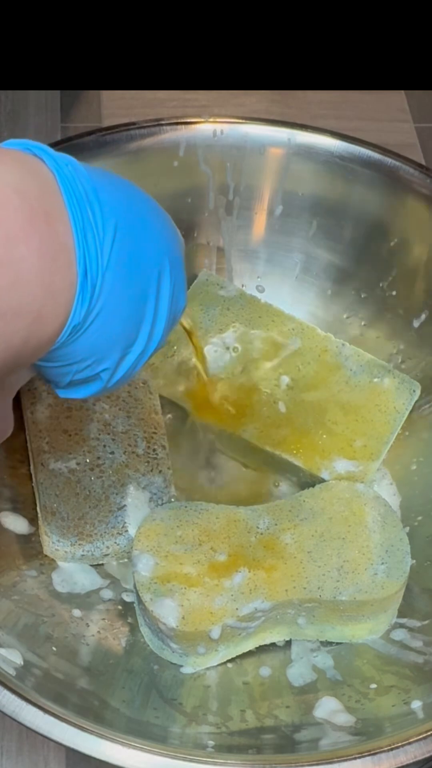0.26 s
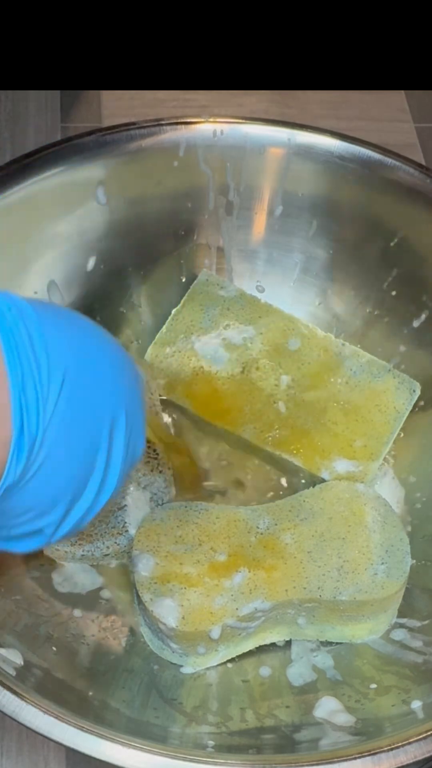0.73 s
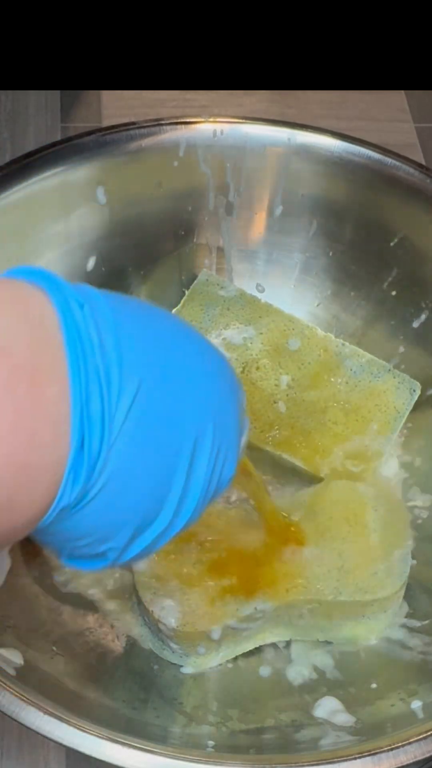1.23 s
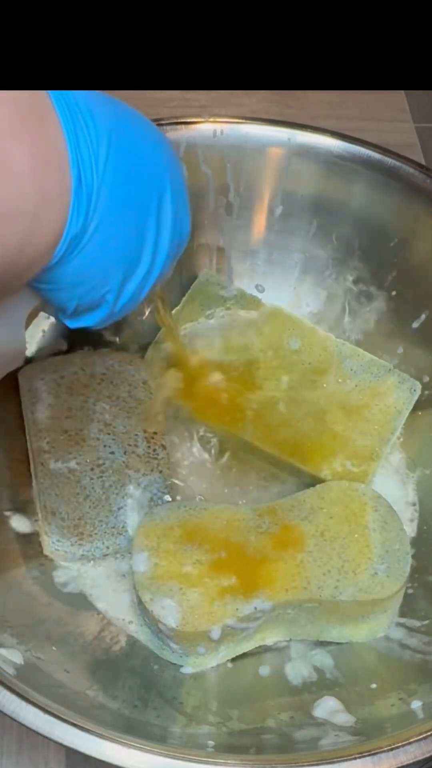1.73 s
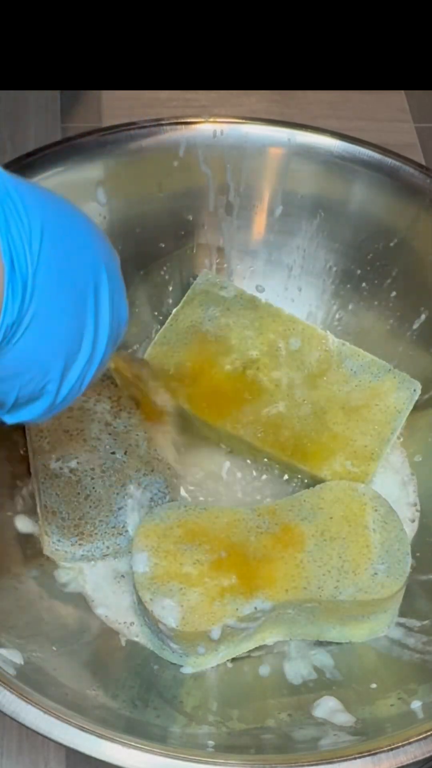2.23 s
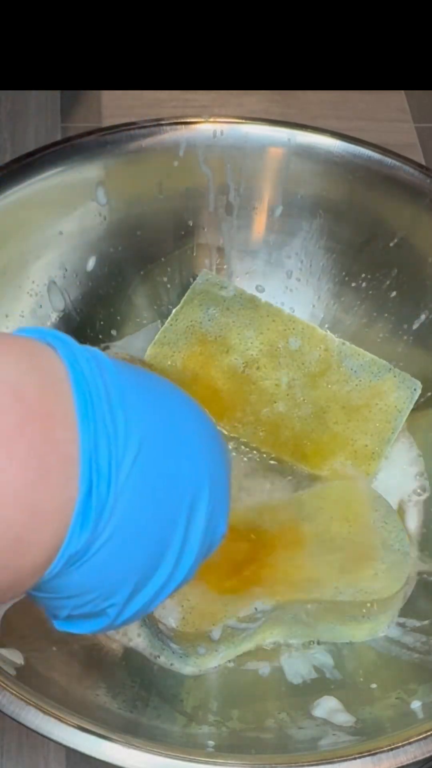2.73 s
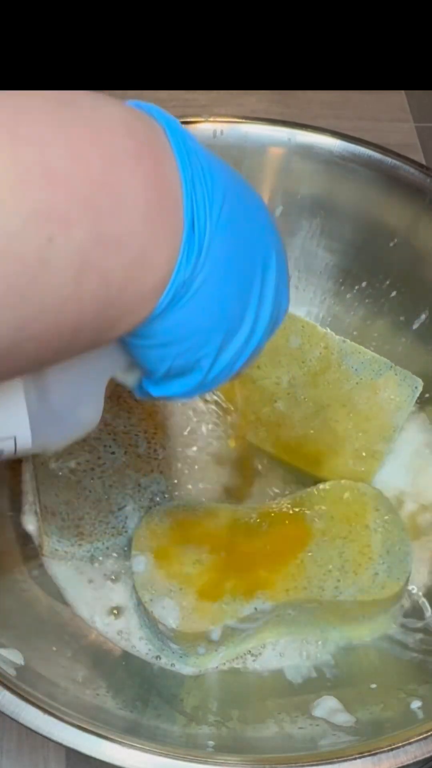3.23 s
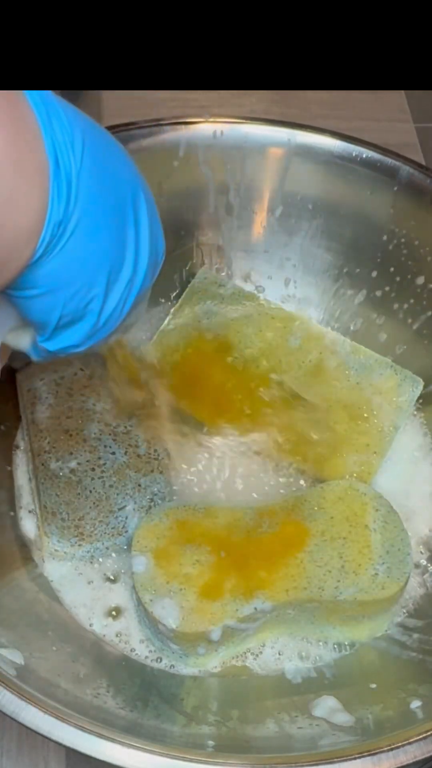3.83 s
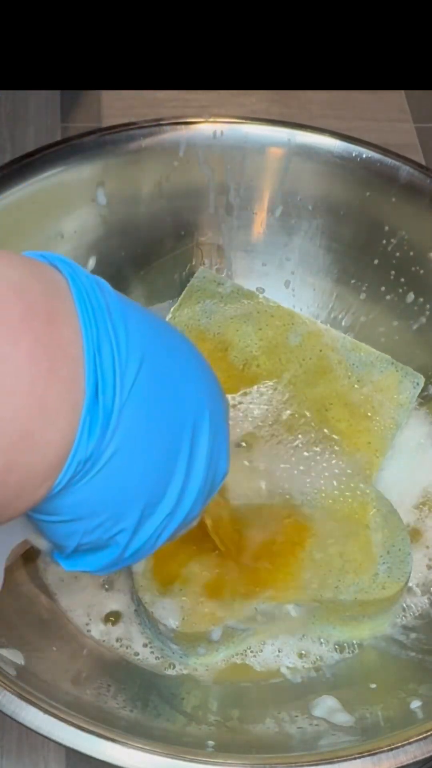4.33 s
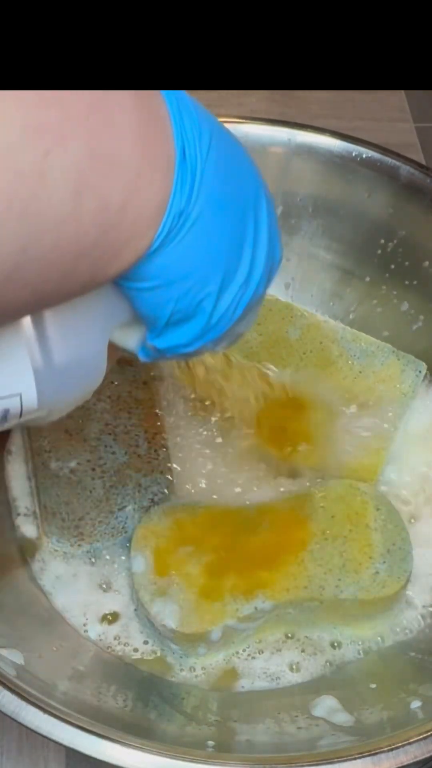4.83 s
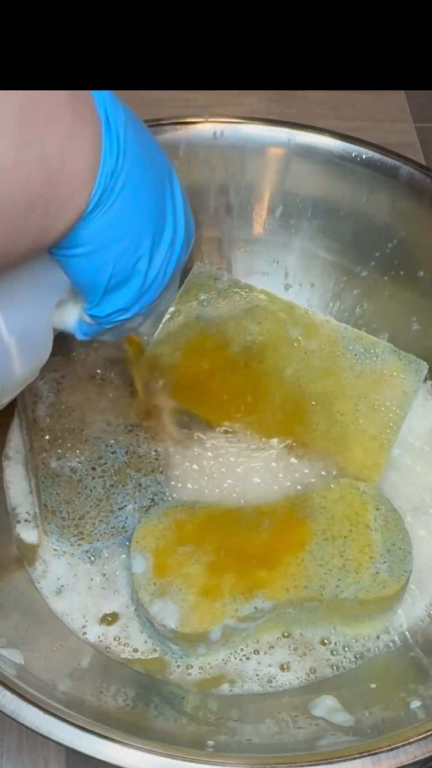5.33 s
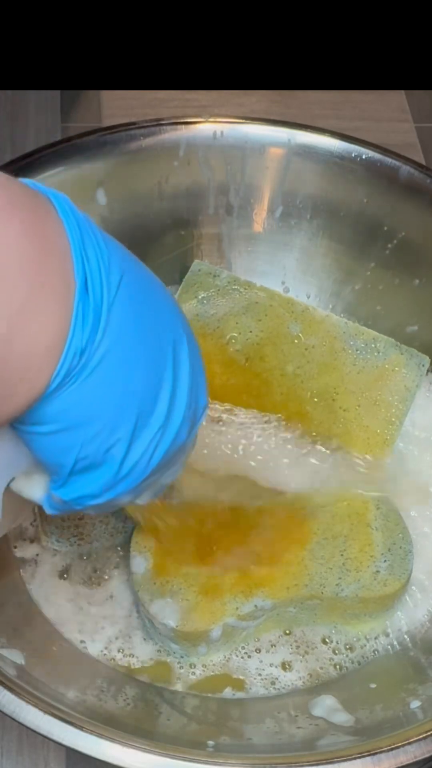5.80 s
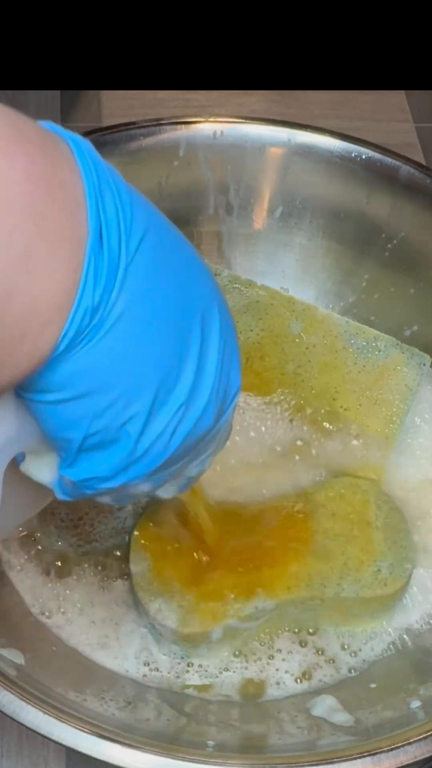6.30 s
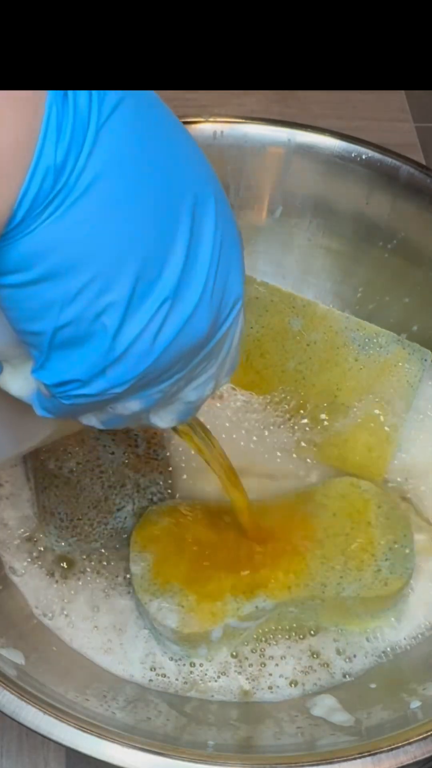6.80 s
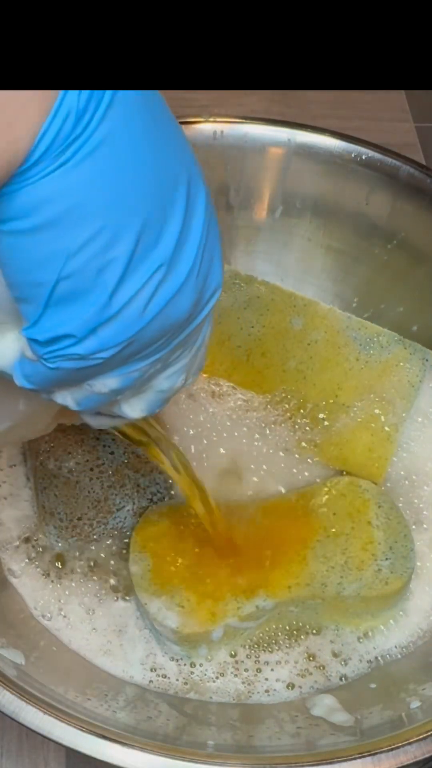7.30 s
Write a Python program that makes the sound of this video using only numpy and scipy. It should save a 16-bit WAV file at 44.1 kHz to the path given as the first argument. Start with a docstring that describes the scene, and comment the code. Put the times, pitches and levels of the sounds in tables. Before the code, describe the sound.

Outdoors at night, close to the microphone, liquid pours from a bottle onto sponges and foam in a metal bowl. Short splashes come in uneven pulses, two to five a second, with hissy fizz, crisp drop ticks and low hollow glugs, strongest around three to four seconds. Later the glugs mostly stop and the flow thins. A high bush-cricket rasp stays constant; wind buffets the microphone in deep thumps.

```python
"""A short splash of soapy liquid comes first, over a bush-cricket rasp nearby and wind on the microphone.
Outdoors at night, a bottle glugs onto sponges and foam in a steel bowl, close to two microphone ports.
Splash and fizz are dense blends of damped bubble tones and hiss, gated in surges; glugs, bubbles and
drops are single ringing tones. The rasp is noise through wing resonances; wind, far traffic and
still air are shaped noise."""
import sys
import numpy as np
from scipy import signal
from scipy.fft import rfft, irfft, next_fast_len
from scipy.io import wavfile
from scipy.ndimage import uniform_filter1d, minimum_filter1d, map_coordinates

SR = 44100
rng = np.random.default_rng(int(sys.argv[2]) if len(sys.argv) > 2 else 0)


def unload_wav(signal):
    """Save mono or channel-first audio to the path in sys.argv[1] as 16-bit WAV at rate SR, clipped to [-1, 1]."""
    wavfile.write(
        sys.argv[1],
        SR,
        np.round(np.clip(np.atleast_2d(signal).T, -1, 1) * 32767).astype(np.int16),
    )


N = 332955

# gushes out of the neck: start_s (middle of the rise), length_s, splash_db,
# plunge_db into standing liquid (relative to splash), mist_db (relative to splash)
SURGES = [(0, 0.061, -29, -13, -11), (0.156, 0.1, -31, -12.5, -3), (0.348, 0.17, -30.5, -9.5, -14),
          (0.512, .14, -29, -9.5, -15), (0.683, .16, -30.5, -7, -14), (0.974, 0.093, -31.5, -7.5, -4),
          (1.067, 0.067, -30, -26, 3.5), (1.218, .1, -30.5, -14, 0.5), (1.342, 0.14, -44, 4, 4),
          (1.443, 0.1, -27, -9, -3), (1.672, 0.071, -27.5, -10, -6), (1.845, 0.051, -24.5, -13, -5),
          (1.917, 0.093, -29.5, -16, -1.5), (2.032, 0.1, -35.5, -3, 3), (2.232, 0.14, -31.5, -5.5, -14),
          (2.44, 0.14, -33, -1, -18), (2.691, 0.14, -30.5, -10.5, -2), (2.871, .16, -27, -17, -2.5),
          (3.108, 0.16, -29, -4.5, -6), (3.336, 0.1, -28, -11, -3.5), (3.527, 0.15, -36, -5.5, -8),
          (3.722, 0.14, -30.5, -7.5, -5), (3.915, 0.12, -32, -1.5, -10), (4.197, 0.098, -25.5, -21, -6),
          (4.354, 0.18, -29.5, -20.5, -3), (4.607, .15, -27.5, -5, -6), (4.79, .06, -27, -12.5, -6),
          (4.87, 0.047, -27.5, -6.5, -11), (4.96, 0.064, -33, -17, -11), (5.029, 0.046, -31.5, -6, -6),
          (5.091, 0.035, -28, -10.5, -14), (5.2, 0.081, -30, -9.5, -13), (5.337, 0.13, -34.5, -3.5, -9),
          (5.57, 0.093, -36.5, -3, -18), (5.743, 0.098, -29, -9.5, -3), (5.891, 0.12, -26, -21, -8),
          (6.042, .1, -31, -24, -4), (6.16, 0.041, -31.5, -14, 0), (6.241, 0.088, -28, -34, -2),
          (6.36, 0.26, -32, -26, -5), (6.62, .25, -37, -23, -5), (7.0, 0.26, -44, -33, -10.5),
          (7.31, .16, -36.5, -38, -9)]
# thin flow between gushes: time_s, level_db
TRICKLE_FLOW = [(0, -40.5), (2.5, -36), (5.5, -39), (6.4, -40.5), (7.1, -45.5), (7.55, -38)]
# spectra of the stream, from the low pool to the fine mist: frequency_hz, level_db
POOL_SPECTRUM = [(250, -25), (450, 4), (750, -2.5), (1300, 1.5), (1800, 8.5), (2500, -15)]
SPATTER_SPECTRUM = [(1300, -48), (1900, -1.5), (2600, 4.5), (3400, -22)]
SPLASH_SPECTRUM = [(2000, -19), (2900, 9), (3400, 8), (4500, 7), (6500, 11), (9000, 10), (11000, -30)]
MIST_SPECTRUM = [(5500, -12), (8000, 3), (9500, -1), (11500, -7), (13500, -10), (15800, -39)]
# liquid churning inside the bottle: time_s, level_db
GURGLE_LEVEL = [(0, -44.5), (.6, -29), (1.0, -44.5), (1.4, -40.5), (2.4, -40), (3.5, -44.5), (4.0, -39.5),
                (4.8, -43.5), (6.3, -44), (7.55, -54)]
# spectrum of that churning: frequency_hz, level_db
BOTTLE_SPECTRUM = [(130, 10), (210, 3), (320, 2), (480, -0.5), (800, -13.5)]
# cricket wing resonances: pitch_hz, width_hz, level_db, lag_strokes, swell_db (either way from level_db)
WING_RESONANCES = [(8370, 220, -.5, -.03, 8), (8200, 60, -2, -0.08, 1), (7960, 320, 1.5, 0.06, 4),
                   (7600, 330, 2, 0.3, 2), (7250, 260, 0, 0.4, 1.5)]
# still air and far traffic: frequency_hz, level_db
NIGHT_SPECTRUM = [(59, -45), (100, -4.5), (156, -10), (519, -10.5), (601, -17), (758, -9.5), (861, -17.5),
                  (2040, -22), (6120, -24.5), (8060, -6), (10800, -35), (15500, -91)]
# wind buffets on the microphone: time_s, level_db
WIND_BUFFETS = [(0.0, -14), (0.61, -16), (0.73, -28), (0.88, -13), (0.92, -25), (1.05, -11.5), (1.2, -22),
                (2.63, -14), (2.69, -30), (3.43, -14), (4.02, -21.5), (4.12, -6), (4.52, -21.5),
                (5.68, -28.5), (5.78, -8), (6.47, -24), (7.08, -16.5), (7.3, -20), (7.36, -10), (7.55, -25)]
# slow pressure swings and faster flutter of the wind: frequency_hz, level_db
RUMBLE_SPECTRUM = [(4, -37), (8, 1.5), (20, 2), (34, -0.5), (62, -14), (100, -57), (200, -90)]
FLUTTER_SPECTRUM = [(40, -13), (70, 1.5), (110, -9.5), (170, -19.5), (260, -29.5), (480, -77)]
# eddies that suck sharply at the ports: centre_s, depth_db
EDDIES = [(0.122, -9), (0.322, -5), (1.064, -8.5), (2.375, -10), (3.288, -9), (3.482, -11), (3.682, -9.5),
          (4.122, -9), (4.342, -16), (4.948, -15), (5.814, -13.5), (7.11, -11.5)]
# drops that smack on foam: start_s, level_db, pitch_hz (at the start), treble_db (relative to the drop)
DROPS = [(0.09, -18, 4440, -8), (0.3294, -11.5, 4520, 4), (0.3692, -14.5, 3260, 14),
         (0.4277, -5.5, 3200, 4), (0.4913, -12, 5140, -12), (0.7005, -9, 6760, -14), (0.741, -17, 3250, -7),
         (0.9888, -7.5, 5450, -13), (1.2197, -8, 5700, -8), (1.288, -23, 2880, -11), (1.478, -24, 3620, -7),
         (1.5508, -6.5, 4030, 1), (1.671, -13, 3100, -4), (1.852, -18, 3180, -9), (1.8761, -17, 6570, -14),
         (2.0847, -7.5, 5600, -9), (2.2046, -7, 5400, -18), (2.2695, -5, 4940, -3),
         (2.2977, -11, 4080, -11), (2.5768, -6, 4360, -15), (2.644, -16, 3580, -8), (2.6704, -8, 6740, -7),
         (2.6976, -7.5, 3650, -16), (2.8777, -14, 3200, -14), (2.8953, -9, 3100, -7),
         (2.927, -2.5, 6130, -15), (3.344, -7, 6370, -1), (3.4245, -8, 3630, -12), (3.715, -11, 4580, 2),
         (4.203, -8.5, 5440, -15), (4.2315, -2, 5900, -23), (4.435, 2, 6700, -7), (4.5115, -6, 4200, -24),
         (4.559, -6, 5360, 3), (4.6189, -21, 5910, -6), (4.646, -13, 3300, -4), (4.7968, -5, 4300, -14),
         (5.107, -16, 4200, -10), (5.3473, -9.5, 6540, 7), (5.482, -6, 6200, -27), (5.5738, -14, 4200, -16),
         (5.7395, -1, 5600, -25), (5.9846, -6.5, 3370, 0), (6.081, -9.5, 4030, -16), (6.112, -8.5, 6370, 1),
         (6.1798, -1.5, 7300, -16), (6.2117, -6.5, 4100, -20), (6.2476, -11, 3200, -23),
         (6.2905, -9, 3540, 5), (6.429, -13, 3640, -17), (6.823, -10.5, 3620, -18), (7.143, -25, 5380, -15)]
# larger bubbles in the pool: start_s, level_db, pitch_hz (at the start), life_cycles (to fall 26 dB)
POOL_BUBBLES = [(0.195, -17, 2770, 8.6), (0.395, -9, 2900, 5.6), (0.476, -14.5, 2540, 9),
                (0.675, -12.5, 1960, 8.6), (1.358, -12.5, 1280, 3.6), (1.852, -11, 2610, 7.1),
                (2.106, -23, 780, 11), (2.344, -17, 2620, 14), (2.738, -17, 2300, 8),
                (2.924, -8, 2870, 6.9), (3.22, -15, 780, 4.9), (3.239, -20, 734, 7.3),
                (3.425, -10.5, 2430, 14), (3.582, -8.5, 2400, 6.6), (4.431, -13, 1970, 7.9),
                (4.628, -19, 1260, 14), (4.655, -8, 3100, 9.1), (5.213, -15.5, 1450, 14),
                (5.574, -21, 690, 10), (5.74, -14, 3250, 19), (5.733, -22.5, 730, 9.9),
                (5.9, -25.5, 1300, 11), (5.911, -15, 2000, 9), (5.915, -16, 2550, 9),
                (5.922, -14, 3300, 12), (6.247, -13.5, 3000, 34), (6.296, -16, 3160, 26),
                (7.159, -23, 3660, 15), (7.19, -25, 2610, 12)]
# air bubbles that break into the neck: start_s, level_db, pitch_hz (at the start), overtone_db (relative)
GLUGS = [(0.369, -14.5, 302, -12), (0.583, -11, 270, -1.5), (0.738, -16, 340, -1), (1.057, -9.5, 287, -5),
         (1.493, -8.5, 295, -9), (1.697, -15.5, 362, -22), (2.104, -9, 323, -2.5), (2.324, -8, 338, -13),
         (2.535, -10.5, 305, -8), (2.741, -25, 245, 7), (2.958, -6, 267, -5.5), (3.185, 1, 316, -4.5),
         (3.386, -7.5, 312, -8.5), (3.794, -7, 328, -10.5), (4.026, -0.5, 317, -16),
         (5.574, -18.5, 412, -4), (5.74, -23, 231, 5.5), (6.161, -11.5, 198, -31)]
# faint difference between the channels: frequency_hz, side_db (relative to mid)
CHANNEL_DIFFERENCE = [(200, -15.5), (1000, -20.5), (3000, -46.5), (4000, -61), (15000, -55)]

RISE_SHARE, FALL_S = 0.25, 0.066  # a gush swells over this share of its length, then falls
PLUNGE_LAG_S = 0.007  # the pool answers a little later
SPATTER_DB, SPATTER_FOLLOWS = -2.5, 0.64  # relative to splash; dB added per dB of plunge
TRICKLE_SPATTER_DB, TRICKLE_POOL_DB, TRICKLE_MIST_DB = -13, -13, -7  # relative to its splash
STROKES_PER_S, STROKE_START = 16.67, 0.21  # wing strokes; part of a stroke done at time 0
CRICKET_DB, NIGHT_DB = -32, -38  # rms
FLUTTER_DB, PORT_WIND_DB = -17, -16  # relative to rumble; port difference relative to shared wind
EDDY_S = 0.0041  # centre of the dip to its zero crossing
GLUG_T60_S = 0.023  # time for the low ring to fall 60 dB
TOP_HZ = 15790  # band limit


def amp(db):
    """Decibels to amplitude."""
    return 10 ** (np.asarray(db) / 20)


def unit(x):
    """x at rms 1."""
    return x / np.sqrt(np.mean(x ** 2) + 1e-20)


def along(points, hz):
    """Interpolate frequency points on a log axis."""
    f, v = np.transpose(points)
    return np.interp(np.log(hz + 1), np.log(f + 1), v)


def level_curve(rows):
    """Interpolate a level in time, one value per sample."""
    s, db = np.transpose(rows)
    return np.interp(np.arange(N) / SR, s, db)


def wobble(rate):
    """A smooth random curve, rate knots a second."""
    knots = rng.standard_normal(400 + N // 100)
    return map_coordinates(knots, [np.arange(N) * rate / SR])


def filtered(x, response):
    """Multiply the spectrum of x by a response of frequency."""
    m = next_fast_len(N + SR // 2)
    spectrum = rfft(x, m) * response(np.fft.rfftfreq(m, 1 / SR))
    return irfft(spectrum, m)[..., :N]


def coloured(x, spectrum):
    """x shaped by a spectrum table, at rms 1."""
    return unit(filtered(x, lambda hz: amp(along(spectrum, hz))))


def bursts(s, db, hz, cycles, rise, size):
    """Damped sines that start softly and rise in pitch like shrinking bubbles."""
    t = np.arange(size) / SR
    turns = hz[:, None] * t
    life = turns / cycles[:, None]
    ring = np.sin(2 * np.pi * turns * (1 + rise * life))
    onset = 1 - np.exp(-4 * turns)
    wave = amp(db)[:, None] * ring * amp(-26 * life) * onset
    at = np.round(s * SR).astype(int)[:, None] + np.arange(size)
    return np.bincount(at.ravel(), wave.ravel(), N + size)[:N]


def patchy(x, patchy_db):
    """Random blots of gain, about 1.5 kHz by 17 ms."""
    z = signal.stft(x, nperseg=256)[2]
    field = uniform_filter1d(rng.standard_normal(z.shape), size=9, axis=0)
    field = uniform_filter1d(field, size=6, axis=1)
    return signal.istft(z * amp(patchy_db * unit(field)), nperseg=256)[1][:N]


def spray(spectrum, centre_hz, octaves, cycles, spread_db, hiss_db, patchy_db, count, size):
    """A dense blend of small bubbles of mixed size and life with hiss, in patches."""
    when = rng.random(count) * N / SR
    pitch, big, long = np.clip(rng.standard_normal((3, count)), -2.2, 2.2)
    hz = np.clip(centre_hz * 2 ** (octaves * pitch), 200, SR / 3)
    grains = bursts(when, spread_db * big, hz, cycles * 2.08 ** long, rise=0.14, size=size)
    hiss = amp(hiss_db) * rng.standard_normal(N)
    return coloured(patchy(unit(grains) + hiss, patchy_db), spectrum)


def gushes(db, trickle_db, lag_s):
    """Gain of one stream layer: powers of the trickle and of each surge's rise, hold and fall add up."""
    t = np.arange(N) / SR - lag_s
    power = amp(2 * (level_curve(TRICKLE_FLOW) + trickle_db))
    for (s, length, *_), level_db in zip(SURGES, db):
        rise = (t - s) / (RISE_SHARE * length) + 0.5
        fall = (s + length - t) / FALL_S + 0.5
        edge = np.clip(np.minimum(rise, fall), 0, 1)
        power = power + amp(2 * level_db) * edge ** 2
    return np.sqrt(power)


def stream():
    """Each surge shakes loose low, middle and fine bubbles; all share the flicker of the jet."""
    flicker = wobble(36)
    jet_db, plunge_db, mist_db = np.transpose(SURGES)[2:]
    slosh = spray(POOL_SPECTRUM, 1000, octaves=0.6, cycles=5, spread_db=2.8, hiss_db=4,
                  patchy_db=2, count=8000, size=400)
    coarse = spray(SPATTER_SPECTRUM, 2300, octaves=0.3, cycles=5, spread_db=2.6, hiss_db=4,
                   patchy_db=2, count=7000, size=300)
    splash = spray(SPLASH_SPECTRUM, 4600, octaves=0.55, cycles=5, spread_db=3.6, hiss_db=1,
                   patchy_db=2.4, count=16000, size=200)
    fizz = spray(MIST_SPECTRUM, 9500, octaves=0.4, cycles=4, spread_db=4, hiss_db=-5,
                 patchy_db=2.5, count=10000, size=80)

    pool_gain = gushes(jet_db + plunge_db, TRICKLE_POOL_DB, PLUNGE_LAG_S)
    pool = pool_gain * amp(2.6 * flicker + 0.54 * wobble(35)) * slosh
    jet = gushes(jet_db, 0, 0) * amp(1.48 * flicker + 0.38 * wobble(21)) * splash
    spatter_db = jet_db + SPATTER_DB + SPATTER_FOLLOWS * plunge_db
    spatter_gain = gushes(spatter_db, TRICKLE_SPATTER_DB, 0)
    spatter = spatter_gain * amp(1.72 * flicker + 2.15 * wobble(25)) * coarse
    mist_gain = gushes(jet_db + mist_db, TRICKLE_MIST_DB, 0)
    mist = mist_gain * amp(1.67 * flicker + 0.79 * wobble(22)) * fizz
    return pool + jet + spatter + mist


def gurgle():
    """Slack low bubbles roll in the bottle."""
    rolling = spray(BOTTLE_SPECTRUM, 300, octaves=0.4, cycles=4, spread_db=3, hiss_db=4,
                    patchy_db=2, count=1200, size=900)
    return amp(level_curve(GURGLE_LEVEL)) * rolling


def crickets():
    """Dense tooth clicks, as noise, ring the wing; its resonances swell in turn, roughly high to low."""
    strokes = STROKE_START + STROKES_PER_S * np.arange(N) / SR
    song = np.zeros(N)
    for hz, width_hz, db, lag, swell_db in WING_RESONANCES:
        teeth = rng.standard_normal(N) * amp(3.6 * wobble(150))
        # two identical resonators in a row
        ring = filtered(teeth, lambda f: (1j * f * width_hz / (hz * hz - f * f + 1j * f * width_hz)) ** 2)
        swell = swell_db * np.cos(2 * np.pi * (strokes - lag))
        song += amp(db + swell + 0.67 * wobble(9.8)) * unit(ring)
    return amp(CRICKET_DB) * unit(song)


def night_air():
    """Steady shaped noise for still air and far traffic."""
    return amp(NIGHT_DB) * coloured(rng.standard_normal(N), NIGHT_SPECTRUM)


def wind():
    """Lumpy pressure swings with faster flutter, a little different at each port, and single sharp dips."""
    lumps = amp(level_curve(WIND_BUFFETS) + 2.5 * wobble(12))

    def buffeting():
        """One independent draw of rumble and flutter under the same lumps."""
        rumble = coloured(rng.standard_normal(N), RUMBLE_SPECTRUM)
        flutter = coloured(rng.standard_normal(N), FLUTTER_SPECTRUM)
        return lumps * (rumble + amp(FLUTTER_DB + 3 * wobble(24)) * flutter)

    both, apart = buffeting(), buffeting()
    for s, db in EDDIES:
        u = ((np.arange(N) / SR - s) / EDDY_S) ** 2
        both = both - amp(db) * (1 - u) * np.exp(-u / 2)
    return both + amp(PORT_WIND_DB) * np.outer([1, -1], apart)


def drops():
    """A drop cracks with a treble tick and at once sheds two weaker bubbles of like pitch."""
    s, db, hz, treble_db = np.transpose(DROPS)
    chance = rng.random((len(s), 3, 3))
    out = bursts(s, db, hz, 7.8 + 0 * s, rise=0.056, size=300)
    tick_hz = 7600 + 2200 * chance[:, 0, 0]
    out += bursts(s, db + treble_db, tick_hz, 4 + 0 * s, rise=0.031, size=100)
    for lag, pitch, weak in chance[:, 1:].transpose(1, 2, 0):
        shed_s = s + 0.0005 + 0.002 * lag
        shed_hz = hz * (0.7 + 0.7 * pitch)
        out += bursts(shed_s, db - 5 - 6 * weak, shed_hz, 6 + 0 * s, rise=0.15, size=300)
    return out


def pool_bubbles():
    """Larger single bubbles in the pool ring a few cycles or more, rising slightly."""
    s, db, hz, cycles = np.transpose(POOL_BUBBLES)
    return bursts(s, db, hz, cycles, rise=0.024, size=900)


def glugs():
    """The air in the bottle rings low for a few cycles, with shorter overtones."""
    out, t = np.zeros(N + SR), np.arange(SR // 8) / SR
    onset = 1 - np.exp(-t / 0.0009)
    for s, db, hz, over_db in GLUGS:
        low = amp(-60 * t / GLUG_T60_S) * np.sin(2 * np.pi * hz * t * (1 + 3 * t))
        high = amp(-60 * t / 0.017) * np.sin(2 * np.pi * 2.19 * hz * t)
        high += 0.54 * amp(-60 * t / 0.012) * np.sin(2 * np.pi * 4.44 * hz * t)
        out[round(s * SR):][:len(t)] += amp(db) * (low + amp(over_db) * high) * onset
    return out[:N]


def scene():
    """The two channels are almost the same: a faint scattered copy of the mix is added to one and taken from
    the other, plus wind."""
    mid = stream() + gurgle() + crickets() + night_air() + drops() + pool_bubbles() + glugs()
    scatter = rng.standard_normal(1500) * amp(-60 * np.arange(1500) / 1500)  # 34 ms tail
    side = signal.fftconvolve(mid, scatter / np.linalg.norm(scatter))[:N]
    side = filtered(side, lambda hz: amp(along(CHANNEL_DIFFERENCE, hz)))
    return np.array([mid + side, mid - side]) + wind()


def record(dry):
    """A limiter turns both channels down together at the highest peaks; then the band limit cuts the top."""
    needed = np.minimum(1, 0.99 / (np.abs(dry).max(axis=0) + 1e-9))
    gain = uniform_filter1d(minimum_filter1d(needed, size=441), size=221)  # 10 ms hold, 5 ms smoothing
    return filtered(dry * gain, lambda hz: hz < TOP_HZ)


dry = scene()
out = record(dry)
unload_wav(out)
```